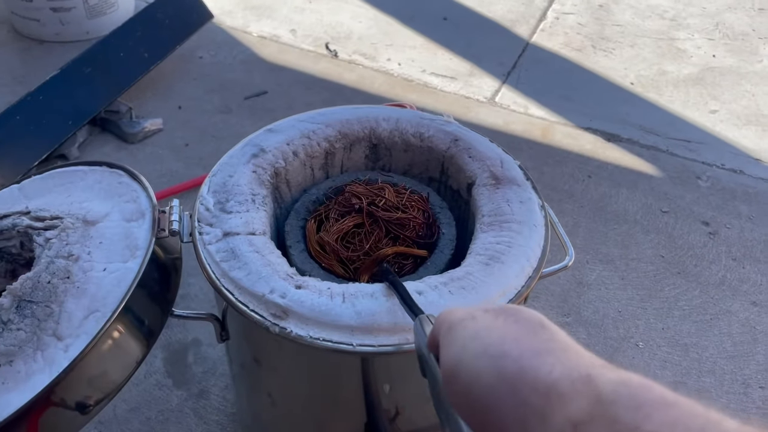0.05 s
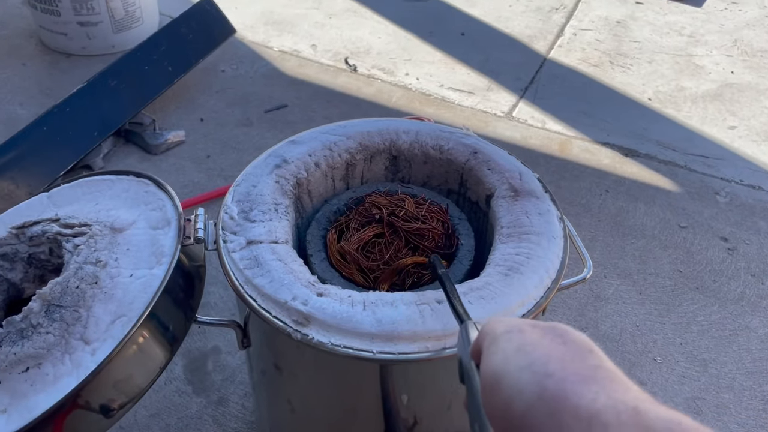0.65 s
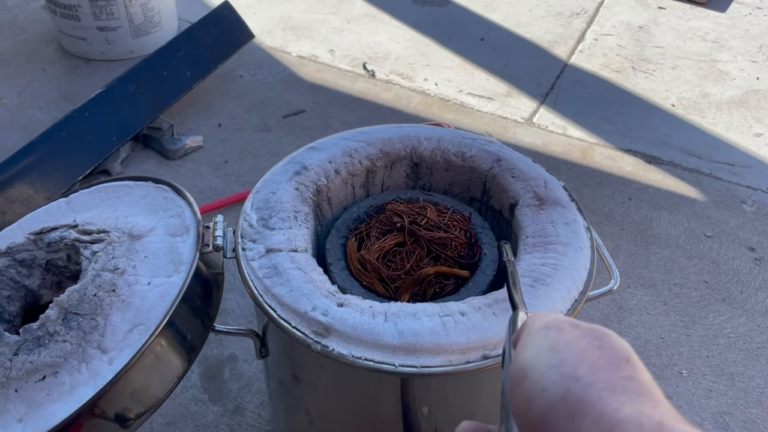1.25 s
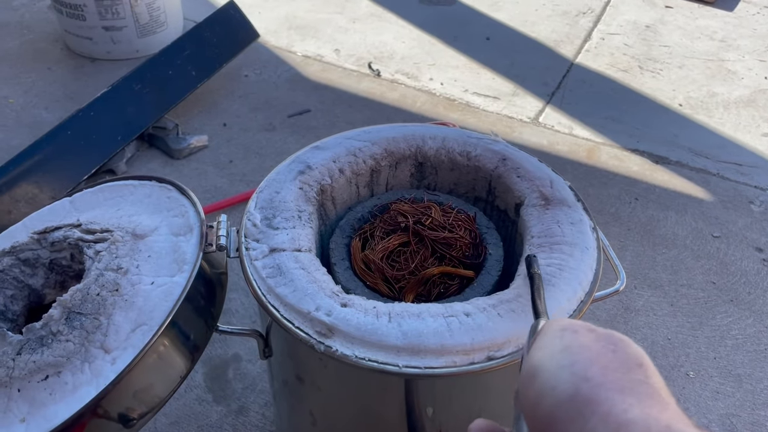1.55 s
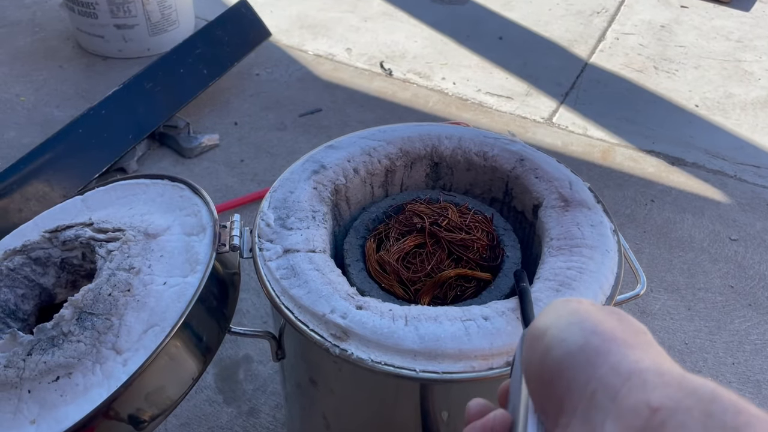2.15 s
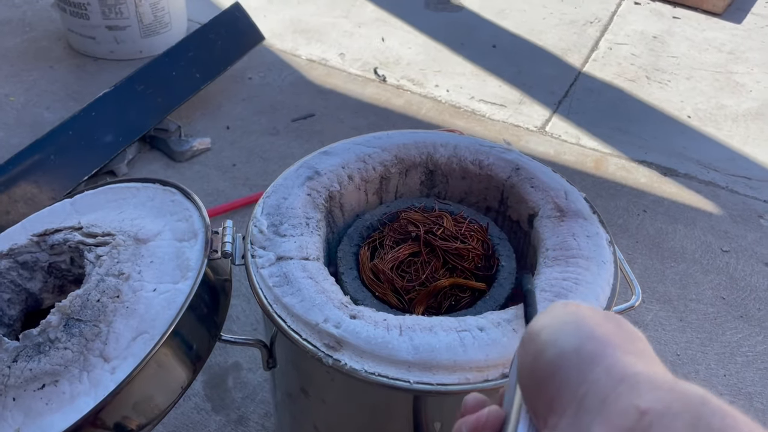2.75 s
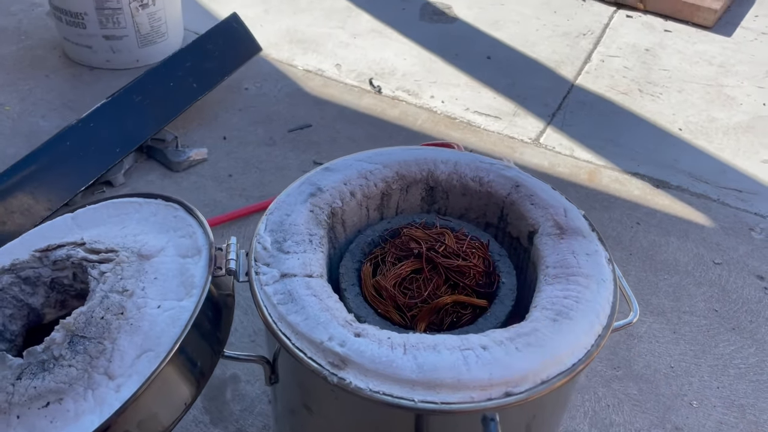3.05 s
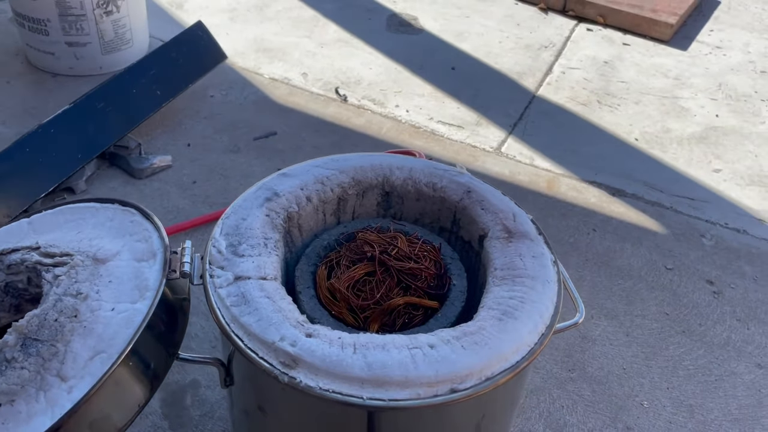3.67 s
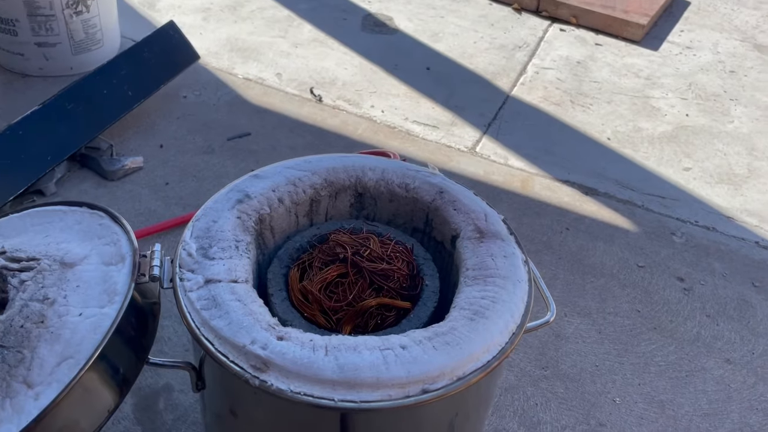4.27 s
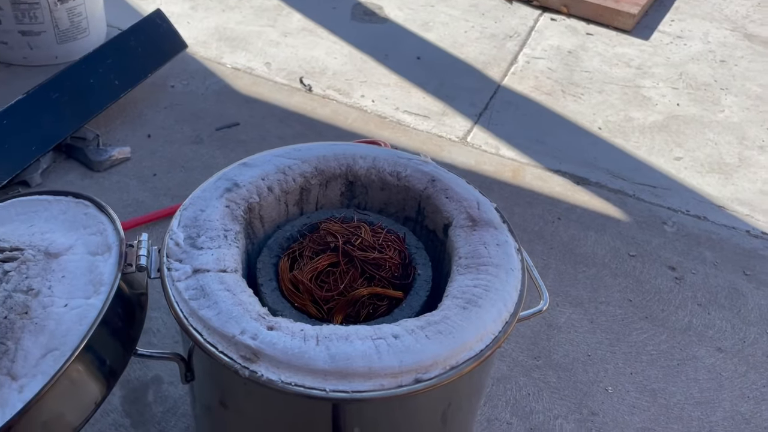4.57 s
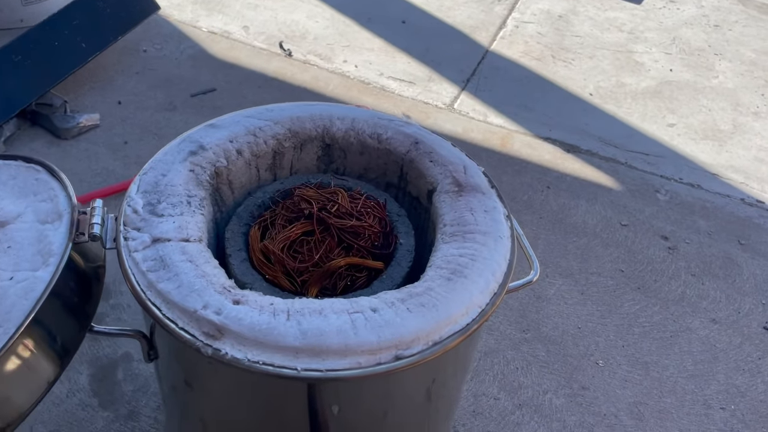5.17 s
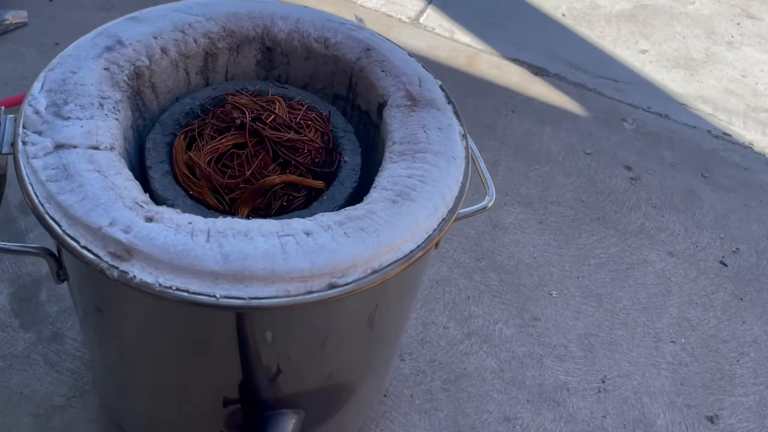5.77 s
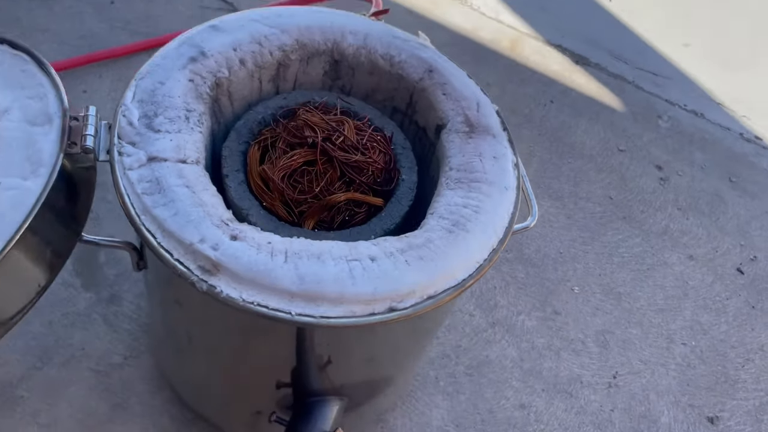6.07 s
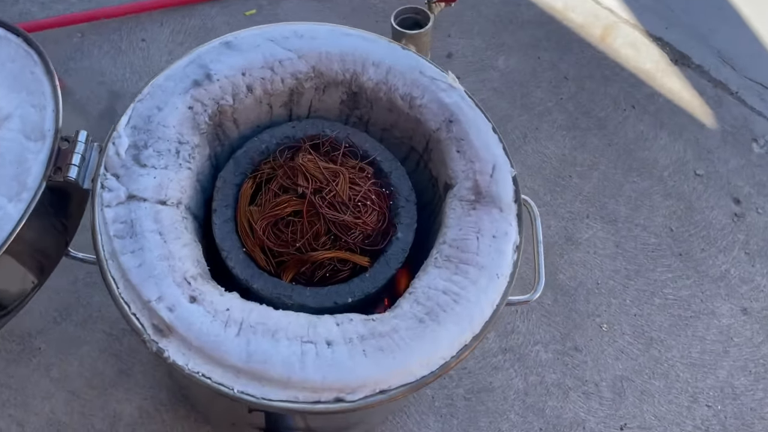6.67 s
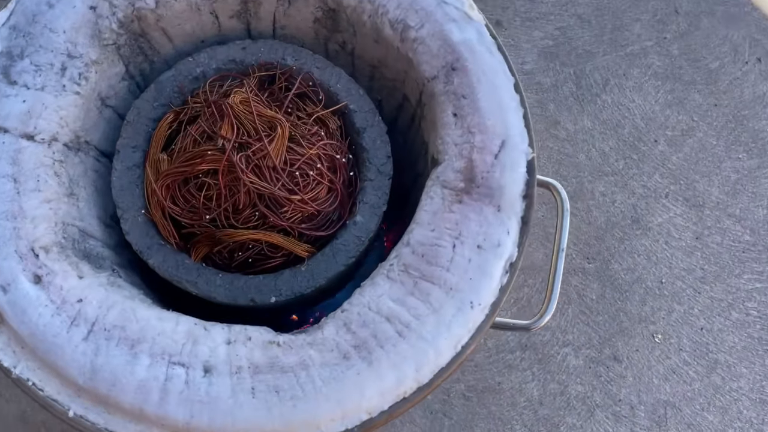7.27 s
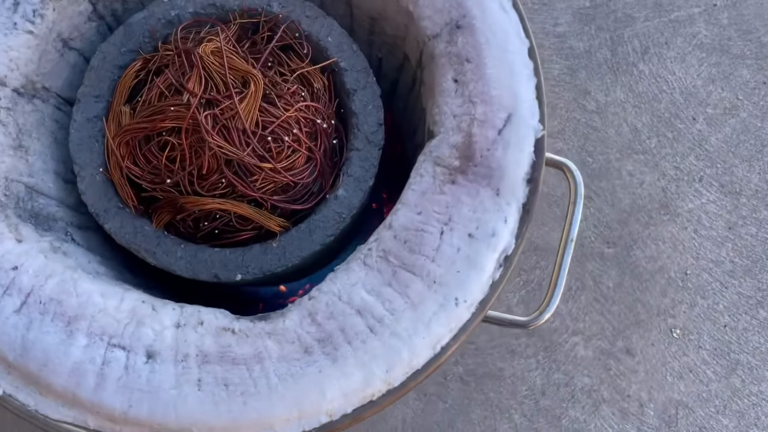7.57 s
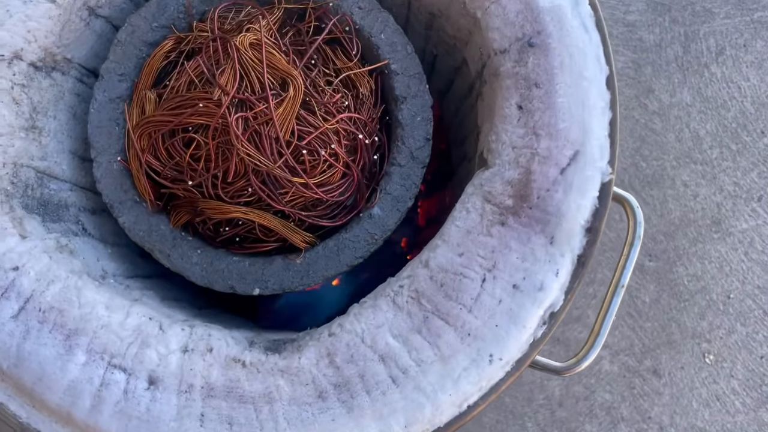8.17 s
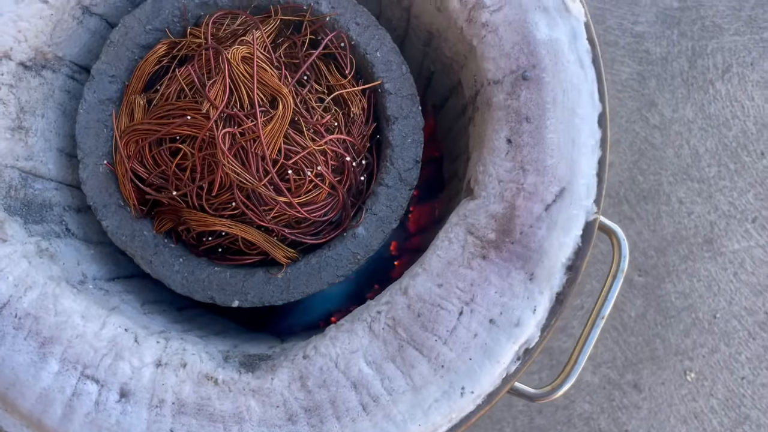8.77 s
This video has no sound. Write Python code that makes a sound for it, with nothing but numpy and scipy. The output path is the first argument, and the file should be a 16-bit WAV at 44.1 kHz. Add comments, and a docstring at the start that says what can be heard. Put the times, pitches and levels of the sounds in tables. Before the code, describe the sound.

A lighter clicks over hissing gas outdoors, then a furnace catches with a deep bang and burns with a steady rushing roar.

```python
"""Lighting a propane furnace

On a breezy concrete driveway, gas hisses from a jet and whistles through the burner tube while a long
piezo lighter rattles and snaps. The pooled gas catches with a bang and a falling thump. The flame then
roars in the lined chamber, brightening as the microphone moves over the open mouth, and the warming
charge of metal gives a few thin ticks."""
import sys
import numpy as np
from scipy import signal
from scipy.fft import rfft, irfft, next_fast_len
from scipy.io import wavfile
from scipy.ndimage import uniform_filter1d, minimum_filter1d

SR = 44100
rng = np.random.default_rng(int(sys.argv[2]) if len(sys.argv) > 2 else 0)


def file_out(sig):
    """Save sig as 16-bit WAV at sys.argv[1]."""
    # one column per channel
    cols = np.atleast_2d(sig).T
    # limit, then scale
    lim = np.clip(cols, -1, 1)
    pcm = np.round(lim * 32767).astype(np.int16)
    wavfile.write(sys.argv[1], SR, pcm)


N = 389403
FFT_SIZE = next_fast_len(N, real=True)
TIME = np.arange(N) / SR
HZ = np.maximum(np.arange(FFT_SIZE // 2 + 1) * SR / FFT_SIZE, 1)
# the pooled gas catches, burns fastest a moment later, and leaves a flame on the burner
CATCH_S, BANG_S, FLAME_S = 2.59, 2.653, 2.676
FLAME_ATTACK_S = 0.01

# Table levels are relative. Spread is a bell curve's sigma; likeness is left-right correlation.
# puffs of breeze on the microphone: t/s, level/dB, spread/s
BREEZE_PUFFS = [(.13, -51, 0.09), (.27, -36.5, 0.027), (.465, -37, 0.022), (.54, -39, .016),
                (.65, -40, 0.059), (.86, -44, 0.022), (.945, -38.5, 0.033), (1.06, -44, 0.053),
                (1.2, -43, 0.044), (1.35, -42, 0.042), (1.49, -42, 0.049), (1.61, -36, 0.019),
                (1.68, -34.5, 0.035), (1.77, -43, .016), (1.84, -37.5, 0.024), (1.96, -46.5, .03),
                (2.49, -53.5, .08)]
# tone of their low buffeting: f/Hz, level/dB
BREEZE_TONE = [(20, -10), (40, 6), (65, 10), (100, 7), (160, -5), (250, -17), (500, -49), (1000, -70)]
# tone of the outdoor bed: f/Hz, level/dB
YARD_TONE = [(20, -50), (90, -2.5), (160, 5), (240, 0), (420, -4.5), (1000, -10), (2000, -11.5),
             (6000, -42)]
# stereo image of the open air: f/Hz, likeness
AIR_LIKENESS = [(100, 1), (500, 0.49), (2000, 0.19), (5000, 0.063)]
# tone of the gas jet at the orifice: f/Hz, level/dB
JET_TONE = [(3000, -3.5), (4300, -16.5), (5000, -11.5), (7400, -12), (8000, -13.5), (8600, 4), (9000, 0.5),
            (10300, 1), (11700, -1.5), (12500, -6.5), (13200, -15), (14300, -17), (15200, -5), (16500, -26)]
# stereo image of the jet: f/Hz, likeness
JET_LIKENESS = [(3000, .45), (7200, 0.69), (8400, 0.94), (11000, 0.85)]
# brief dips and surges in the jet's hiss: t/s, gain/dB, spread/s
JET_DIPS = [(2.79, -4, .025), (3.133, 4.5, 0.018), (3.214, -6, .015), (3.592, -6, 0.055), (4.61, -4, 0.016),
            (4.82, 1.5, .028), (5.85, -7, 0.025), (6.04, -4.5, .018), (6.874, 3.5, .05), (8.58, -11, .02)]
# air-column resonances of the burner tube: f/Hz, width/Hz, level/dB
TUBE_MODES = [(1475, 40, 12.5), (2020, 240, 2), (2365, 130, 4), (3450, 540, -10.5)]
# the whistle's glide and its three lower modes: t/s, pitch shift/%, first/dB, second/dB, third/dB
WHISTLE_MOVES = [(2.4, 0, 0.5, 2.5, -1.5), (2.9, 0, 2, 1, -0.5), (4.0, 0.5, -0.5, 2, -6),
                 (4.5, 0.36, 0.5, 1.5, 0), (5.15, 0, 0.5, -3.5, -0.5), (5.6, -1, 1.5, -0.5, 3),
                 (6.4, -3, -1.5, -11, 0), (6.75, -2.5, -1, 3, -2), (7.2, 0, -1, -3.5, 4),
                 (7.9, 0, 4, 1, -1), (8.6, .5, -7, -1, -2.5)]
# the microphone's move: t/s, position (0 beside the furnace, 1 over its mouth)
MIC_PATH = [(5.3, 0.12), (6.55, 0.36), (6.76, 0.87), (7.05, 0.97), (7.7, 1)]
# the lighter's trigger sliding and springing back: t/s, level/dB
TRIGGER_CLICKS = [(.085, -35.5), (.3512, -32.5), (.4425, -39), (.4694, -32), (.7273, -42), (.7473, -31),
                  (.8291, -43), (.8506, -35), (1.1873, -43), (1.2078, -31), (1.2826, -40), (1.306, -37),
                  (1.5375, -30), (1.6353, -44), (1.6622, -35), (1.8598, -31.5), (1.958, -39), (2.0114, -36),
                  (2.263, -29.5), (2.2843, -35), (2.3646, -37.5), (2.3946, -34), (2.6265, -29),
                  (2.7083, -35), (2.865, -32)]
# the piezo hammer's snaps: t/s, level/dB, rebound delay/s, rebound gain/dB, grip knock/dB
HAMMER_SNAPS = [(0.5327, -15, 0.0017, -5.5, -23), (0.8887, -15, 0.0032, -6, -31),
                (1.357, -13.5, 0.0026, -8.5, -15), (2.262, -25.5, 0.0026, -19, -19.5),
                (2.4396, -15, 0.002, -3.5, -20), (2.7391, -18.5, 0.0014, -2, -17),
                (2.8565, -30.5, 0.0045, -5, -21)]
# resonances of the lighter's plastic case: f/Hz, width/Hz, level/dB
CASE_MODES = [(320, 120, -9.5), (499, 97, -2), (785, 260, -9.5), (1280, 140, 0.5), (1680, 130, -8),
              (1910, 180, 1.5), (2210, 170, 3), (2710, 260, -5.5), (4440, 620, 6), (5000, 590, 2.5),
              (5700, 370, 4.5), (6440, 410, 3.5), (7050, 530, 11.5), (7690, 420, 12), (8440, 410, 15),
              (10300, 1500, -1.5), (11600, 600, 0), (15100, 1500, -14)]
# the case's tone over all directions, its peaks blurred: f/Hz, level/dB
CASE_ALL_ROUND = [(250, -14), (500, -2), (1000, -6), (2000, 5), (3300, 1.5), (4500, 8), (6800, 10),
                  (9000, 3), (12000, 9), (13500, -13)]
# resonances of the hollow grip: f/Hz, width/Hz, level/dB
GRIP_MODES = [(525, 100, -5), (860, 160, -6), (1230, 150, -4), (2150, 400, 0), (3020, 550, 3),
              (4540, 450, 7)]
# tone of the ignition bang: f/Hz, level/dB
BANG_TONE = [(40, -5), (130, 9), (280, 4.5), (440, 2.5), (560, -6.5), (800, -7), (1150, -18), (1500, -17.5),
             (2200, -25), (4000, -31), (7000, -35), (11000, -32), (16000, -45)]
# tone of turbulent burning: f/Hz, level/dB
FLAME_TONE = [(20, -35), (33, -26.5), (48, -15.5), (63, -5), (100, -1), (135, -2), (190, -3.5), (260, -5),
              (430, -11), (520, -17), (780, -26), (1100, -36.5), (1700, -45), (3000, -66)]
# stereo image of the flame: f/Hz, likeness
FLAME_LIKENESS = [(100, 1), (250, 0.98), (500, 1), (1000, 0.77), (2500, 0.54), (3500, 0.74), (7200, 0.55),
                  (8200, 1)]
# the chamber's peaks and notches: f/Hz, width/Hz, gain from beside/dB, gain from above/dB
CHAMBER_EQ = [(165.3, 8.5, -6, 1), (195.3, 32, 5, 0.5), (217, 16.4, -14.5, 1), (292.7, 13.7, -13.5, -2.5),
              (305, 17, -0.5, -2.5), (344, 50, 3, 0), (434, 37, 1.5, 1), (494.6, 63, -9, -6.5),
              (1297, 200, 5, 16), (1331, 112, -25, -32)]
# resonances of the gap round the crucible: f/Hz, width/Hz, level/dB
MOUTH_MODES = [(1040, 190, 12), (1525, 110, -6.5), (1870, 92, -3.5), (2560, 154, 1.5), (3250, 280, -9),
               (3480, 300, -20.5), (4600, 290, -13.5), (5100, 260, -22), (10200, 5700, -13)]
# sinking and flaring of the treble in the flame's rush: t/s, gain/dB
TREBLE_FLARES = [(7.3, -1.5), (7.42, -8), (7.6, 0.5), (8.0, 1), (8.07, -5), (8.13, 2), (8.23, -4),
                 (8.28, 4), (8.38, -4), (8.5, 0.5)]
# soft swells of hiss: t/s, level/dB, spread/s
HISS_SWELLS = [(3.15, -64, 0.061), (3.25, -56, 0.054), (3.322, -50, 0.017), (3.75, -59, 0.14),
               (4.22, -55.5, 0.19), (4.63, -58, .035), (5.24, -51.5, 0.046), (5.56, -56, .03),
               (5.73, -52.5, 0.09), (5.91, -54, 0.037), (6.366, -55, 0.044), (6.72, -55, 0.027)]
# ticks of the warming charge: t/s, level/dB
HEAT_TICKS = [(7.5578, -15), (7.569, -10), (7.578, -24)]
# phase between the sides of the microphone pair: f/Hz, left lead/rad
MIC_PHASE = [(150, 0), (800, -0.7), (1290, -0.34), (1800, 1.3), (2100, -0.65), (2850, -1.5), (3500, -1.5),
             (4300, -0.5), (5000, 0.1), (5750, -2.5), (6400, 1.5), (7300, 0.5), (7700, 4), (8500, 3),
             (10400, 6), (11500, 5), (12800, 11), (14200, 10.5), (14700, 14)]
# balance of the microphone pair: f/Hz, left minus right/dB
MIC_BALANCE = [(650, 0.5), (950, -4), (1250, 0.5), (1600, -6), (2300, 1), (3400, -4), (5200, 0), (8000, 0)]


def from_db(db):
    """Decibels to gain."""
    return np.exp(np.asarray(db) * (np.log(10) / 20))


def unit_power(x):
    """Scale to an RMS of 1."""
    return x / np.sqrt(np.mean(x ** 2) + 1e-20)


def automation(rows):
    """Breakpoints in time to one curve per value column."""
    times, *columns = np.transpose(rows)
    return [np.interp(TIME, times, column) for column in columns]


def over_hz(points):
    """Breakpoints joined on a log-frequency axis."""
    hz, value = np.transpose(points)
    return np.interp(np.log(HZ), np.log(hz), value)


def filtered(x, response):
    """Pass a sound through a frequency response."""
    return irfft(rfft(x, FFT_SIZE) * response, FFT_SIZE)[..., :N]


def lowpass(hz, order):
    """Response that rolls off the top."""
    return 1 / (1 + (HZ / hz) ** order)


def highpass(hz, order):
    """Response that rolls off the bottom."""
    return 1 / (1 + (hz / HZ) ** order)


def delayed(seconds):
    """Response of a pure delay."""
    return np.exp(-2j * np.pi * HZ * seconds)


def resonances(modes):
    """Response of damped resonators in parallel, with notches between them."""
    return sum(from_db(db) / (1 + 1j * (HZ ** 2 - hz ** 2) / (HZ * width)) for hz, width, db in modes)


def panned(x, left_db):
    """Lift the left side over the right by left_db."""
    return x * from_db(left_db * np.array([[0.5], [-0.5]]))


def drift(rate_hz):
    """Smooth random modulation with an RMS of 1."""
    return unit_power(filtered(rng.standard_normal(N), lowpass(rate_hz, 2)))


def noise(response, likeness):
    """Coloured stereo noise of unit power, its two sides partly alike."""
    mid, side = rfft(rng.standard_normal((2, FFT_SIZE)))
    alike = np.clip(likeness, -1, 1)
    stereo = np.sqrt(1 + alike) * mid + np.sqrt(1 - alike) * side * [[1], [-1]]
    return unit_power(irfft(stereo * response, FFT_SIZE)[:, :N])


def contacts(rows, t60_s):
    """Each contact (t/s, level/dB) sets off a burst of chatter that dies away."""
    hits = np.zeros(N)
    for at_s, db in rows:
        hits[round(at_s * SR)] += from_db(db)
    envelope = signal.lfilter([1], [1, -from_db(-60 / (t60_s * SR))], hits + 1e-18)
    return envelope * rng.choice([-1, 1], N)


def bell(at_s, spread_s):
    """A smooth rise to 1 and fall around a moment."""
    return np.exp(-0.5 * ((TIME - at_s) / spread_s) ** 2)


def humps(rows):
    """An envelope with one bell for each (t/s, level/dB, spread/s)."""
    return sum(from_db(db) * bell(at_s, spread_s) for at_s, db, spread_s in rows)


def fade_in(start_s, length_s):
    """A straight rise from 0 to 1."""
    return np.clip((TIME - start_s) / length_s, 0, 1)


def burst(peak_s, rise_db_per_s, hold_s, fall_db_per_s):
    """An attack-hold-decay envelope, straight in dB."""
    attack_db = rise_db_per_s * (TIME - peak_s)
    decay_db = fall_db_per_s * (peak_s + hold_s - TIME)
    return from_db(np.clip(np.minimum(attack_db, decay_db), -200, 0))


def overhead():
    """How far the microphone is over the mouth, 0 to 1."""
    return np.clip(automation(MIC_PATH)[0], 0, 1)


def beamed(above_db):
    """Gain that moves from unity beside the furnace to above_db over its mouth."""
    return 1 + (from_db(above_db) - 1) * overhead() ** 2


def outdoors(yard_db=-56, calm_db=-58):
    """Puffs of a light breeze buffet the microphone over a faint outdoor bed."""
    gusts = np.hypot(from_db(calm_db), humps(BREEZE_PUFFS))
    breeze = gusts * noise(from_db(over_hz(BREEZE_TONE)), likeness=0.73)
    return breeze + from_db(yard_db) * noise(from_db(over_hz(YARD_TONE)), over_hz(AIR_LIKENESS))


def gas(jet_db=-48, tube_cold_db=-55.5, tube_lit_db=-46.5, jet_flutter_db=0.7, tube_flutter_db=1.7):
    """The jet hisses at the orifice and sounds the burner tube, which swells once the flame draws air."""
    wall_comb = 1 + from_db(-10) * delayed(0.000892)   # reflection off the furnace wall
    lit_draught = from_db(tube_lit_db + tube_flutter_db * drift(5.2)) * firing(warming_db_per_s=0.55)
    draught = np.hypot(from_db(tube_cold_db), lit_draught)
    air = noise(wall_comb / (1 + (1200 / HZ) ** 4 + (HZ / 3200) ** 6), likeness=0.85)
    tube = draught * beamed(above_db=-2) * whistle(air)
    dips_db = sum(db * bell(at_s, spread_s) for at_s, db, spread_s in JET_DIPS)
    flow = from_db(jet_db + dips_db + sputter() + jet_flutter_db * drift(16))
    hiss = noise(wall_comb * from_db(over_hz(JET_TONE)) * highpass(2500, 4), over_hz(JET_LIKENESS))
    jet = flow * beamed(above_db=-2) * hiss
    return panned(tube, left_db=2.5) + off_the_ground(jet)


def whistle(air):
    """Rushing air sounds the tube's resonances, which swell, fade and glide a little."""
    shift_percent, *levels_db = automation(WHISTLE_MOVES)
    *lower, highest = TUBE_MODES
    tone = filtered(air, resonances([highest]))
    tone += sum(from_db(db) * filtered(air, resonances([mode])) for mode, db in zip(lower, levels_db))
    varispeed_s = np.cumsum(1 + shift_percent / 100) / SR % TIME[-1]
    return unit_power(np.array([np.interp(varispeed_s, TIME, side) for side in tone]))


def off_the_ground(x, echo_db=-9, path_s=0.0016, overhead_s=-0.00026, sway_s=0.00002):
    """A reflection off the ground combs the hiss, shifting as the hand-held microphone moves."""
    lag_s = path_s + overhead_s * overhead() + sway_s * drift(0.6)
    return x + from_db(echo_db) * np.array([np.interp(TIME - lag_s, TIME, side) for side in x])


def lighter(snap_t60_s=0.013, trigger_db=10, thin_hz=400, soft_hz=540, hard_hz=7500):
    """The trigger rattles, the hammer strikes, the case rebounds: all ring the same plastic body."""
    at_s, db, rebound_s, rebound_db, _ = np.transpose(HAMMER_SNAPS)
    tick = contacts(zip(at_s, db + 6), t60_s=0.0029)
    chatter = contacts(zip(at_s, db), snap_t60_s)
    rebound = contacts(zip(at_s + rebound_s, db + rebound_db), snap_t60_s)
    # the hard little hammer hardly moves the low modes
    strikes = filtered(tick + chatter + rebound, 1 / (1 + thin_hz / (1j * HZ)))
    # the trigger's softer contacts favour them
    soft_shelf = (1 + 1j * HZ / hard_hz) / (1 + 1j * HZ / soft_hz)
    rattle = contacts(TRIGGER_CLICKS, t60_s=0.04) + from_db(4) * contacts(TRIGGER_CLICKS, t60_s=0.0087)
    drive = strikes + from_db(trigger_db) * filtered(rattle, soft_shelf)
    body = filtered(drive, resonances(CASE_MODES)) + grip_knock()
    all_round = filtered(drive, from_db(over_hz(CASE_ALL_ROUND)))
    return driveway(panned(body, left_db=-0.5), all_round)


def driveway(direct, all_round, slap_db=-19, slap_s=0.011, tail_db=-13.5, t60_s=0.2):
    """One slap off the concrete, then a thin tail as walls and clutter scatter the all-round sound."""
    scatter = rng.standard_normal((2, N)) * from_db(-60 * TIME / t60_s) * fade_in(0, slap_s)
    scatter /= np.sqrt(np.sum(scatter ** 2, axis=1, keepdims=True))
    dull = lowpass(12000, 4)
    slap = filtered(direct, from_db(slap_db) * delayed(slap_s) * dull)
    tail = filtered(all_round, from_db(tail_db) * rfft(scatter, FFT_SIZE) * dull)
    return direct + slap + tail


def grip_knock():
    """Each snap jolts the hollow grip, which answers with a short, dry knock."""
    at_s, *_, knock_db = np.transpose(HAMMER_SNAPS)
    return filtered(contacts(zip(at_s, knock_db), t60_s=0.0076), resonances(GRIP_MODES))


def hand_rub(level_db=-53, grain_db=2, pitch_hz=340, width_hz=90):
    """The hand rubs on the lighter as it shifts its hold."""
    envelope = from_db(level_db + grain_db * drift(30)) * bell(at_s=0.63, spread_s=0.088)
    return envelope * noise(resonances([(pitch_hz, width_hz, 0)]), likeness=0.62)


def thump(level_db=-3, stir_db=-28, peak_s=2.676, hold_s=0.015, start_hz=105, end_hz=42, sag_s=0.014):
    """The chamber stirs as the gas catches, heaves with the bang, and sags in pitch once it is spent."""
    hz = end_hz + (start_hz - end_hz) * np.exp(-np.maximum(TIME - peak_s, 0) / sag_s)
    stir = from_db(stir_db) * fade_in(CATCH_S, 0.031) ** 2 * (1 - fade_in(BANG_S, hold_s))
    heave = from_db(level_db) * burst(peak_s, 1300, hold_s, 580)
    return (stir + heave) * np.sin(2 * np.pi * np.cumsum(hz * (TIME > CATCH_S)) / SR)


def bang(flare_s=2.638, flare_db=-15, crack_db=1.5, split_hz=1100, grit_db=0.5, hold_s=0.018):
    """A pocket of gas flares, then the front sweeps the rest in a whoomph, cracking at its fastest."""
    front = from_db(grit_db * drift(250)) * noise(from_db(over_hz(BANG_TONE)), over_hz(FLAME_LIKENESS))
    whoomph = filtered(front, lowpass(split_hz, 4))
    crack = from_db(crack_db) * (front - whoomph) * burst(BANG_S, 3200, hold_s, 2300)
    flare = from_db(flare_db) * burst(flare_s, 3200, BANG_S - flare_s, 2600)
    sweep = burst(BANG_S, 1700, hold_s, 2600)
    return whoomph * np.maximum(flare, sweep) + crack


def firing(warming_db_per_s, starved_db=-7, recover_s=0.1):
    """Strength of the flame: it lights starved of air, recovers, and grows as the chamber warms."""
    age_s = np.maximum(TIME - FLAME_S, 0)
    strength_db = starved_db * np.exp(-age_s / recover_s) + warming_db_per_s * age_s
    return fade_in(FLAME_S, FLAME_ATTACK_S) * from_db(strength_db)


def flame(rumble_db=-13.5, roar_db=-20, rush_db=-54.5, split_hz=220):
    """Turbulent burning in the chamber: rumble, roar and fine rush; the finer, the more it beams up."""
    tone, likeness = from_db(over_hz(FLAME_TONE)), over_hz(FLAME_LIKENESS)
    low_share = lowpass(split_hz, 6)
    surge = drift(41)   # lifts the roar and the rush together
    rumble = from_db(rumble_db) * beamed(above_db=0.13) * noise(tone * np.sqrt(low_share), likeness)
    roar_gain = from_db(roar_db + 1.5 * surge) * beamed(above_db=4)
    roar = roar_gain * noise(tone * np.sqrt(1 - low_share), likeness)
    rush_gain = from_db(rush_db + 0.5 * surge + 0.5 * drift(3.2)) * beamed(above_db=16.5)
    rush = flaring(rush_gain * noise(resonances(MOUTH_MODES) * lowpass(11000, 8), likeness))
    burning = panned(rumble, 0.63) + panned(roar, -0.75) + off_the_ground(panned(rush, -1.5))
    return firing(warming_db_per_s=0.45) * chamber(burning)


def flaring(rush, treble_hz=3000):
    """The treble of the rush sinks and flares while its body holds steady."""
    treble = filtered(rush, highpass(treble_hz, 8))
    return rush + (from_db(automation(TREBLE_FLARES)[0]) - 1) * treble


def chamber(burning):
    """The chamber's peaks and notches colour the flame, crossfading with the listening angle."""
    beside_db = above_db = 0
    for hz, width, side_db, top_db in CHAMBER_EQ:
        band = 1 / (1 + (2 * (HZ - hz) / width) ** 2)
        beside_db += side_db * band
        above_db += top_db * band
    beside, above = filtered(burning, from_db(beside_db)), filtered(burning, from_db(above_db))
    return (1 - overhead()) * beside + overhead() * above


def sputter(rate_hz=5.4, width_hz=5.6, depth_db=1.5, mean_db=-1):
    """The burning chamber pushes back on the jet, pulsing its hiss unevenly; a gain in dB."""
    pulsing = unit_power(filtered(rng.standard_normal(N), resonances([(rate_hz, width_hz, 0)])))
    return fade_in(FLAME_S, FLAME_ATTACK_S) * (mean_db + depth_db * pulsing)


def hiss_swells(centre_hz=4500, width_hz=4800):
    """A broad hiss swells softly now and then."""
    return humps(HISS_SWELLS) * noise(resonances([(centre_hz, width_hz, 0)]) ** 2, likeness=0.5)


def heat_ticks(pitch_hz=11000, width_hz=4500):
    """A few thin, sharp ticks in quick succession as the charge warms."""
    ring = resonances([(pitch_hz, width_hz, 0)]) * lowpass(12500, 8)
    return filtered(contacts(HEAT_TICKS, t60_s=0.005), ring)


def scene():
    """Open air, gas and lighter, then the ignition and the burning furnace."""
    lead_in = outdoors() + gas() + lighter() + hand_rub()
    return lead_in + thump() + bang() + flame() + hiss_swells() + heat_ticks()


def record(dry, ceiling=0.97, limiter_samples=300, cutoff_hz=15800):
    """The microphone pair skews phase and balance; a fast limiter and a steep high cut follow."""
    phase_skew = np.exp(1j * over_hz(MIC_PHASE) * [[0.5], [-0.5]])
    pair = filtered(dry, panned(phase_skew, over_hz(MIC_BALANCE)))
    safe_gain = np.minimum(1, ceiling / (np.abs(pair).max(axis=0) + 1e-9))
    gain = uniform_filter1d(minimum_filter1d(safe_gain, limiter_samples), limiter_samples)
    return filtered(pair * gain, np.sqrt(lowpass(cutoff_hz, 160)))


dry = scene()
out = record(dry)
file_out(out)
```